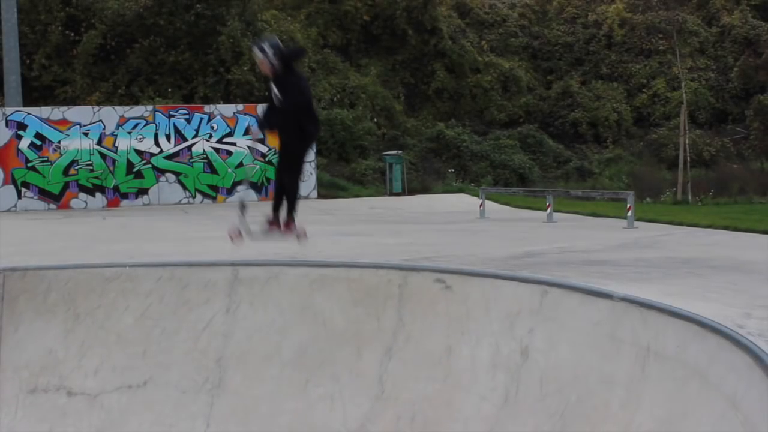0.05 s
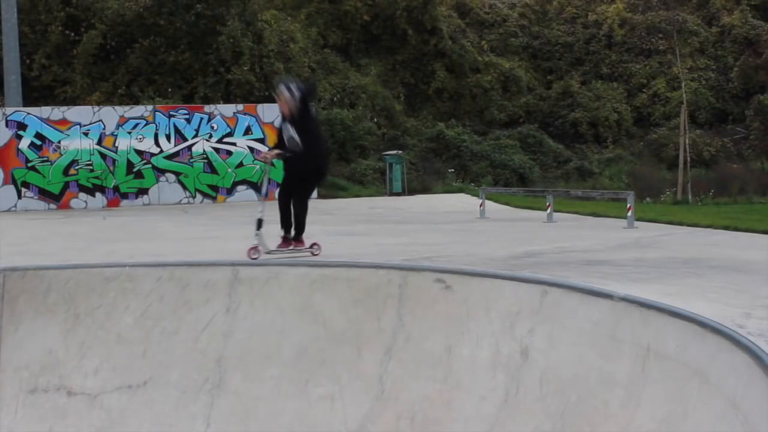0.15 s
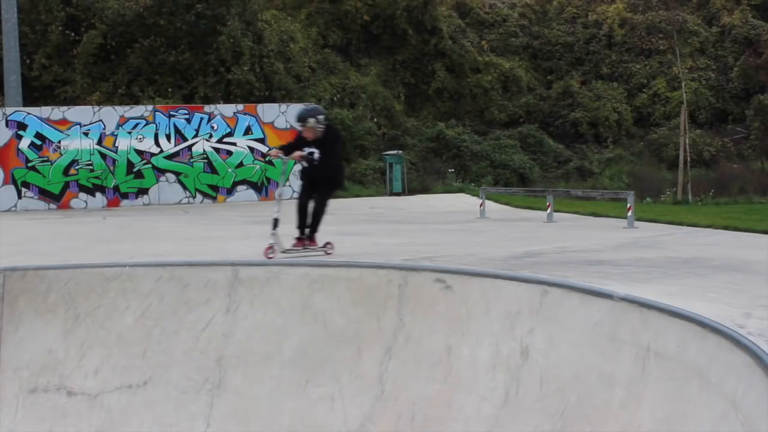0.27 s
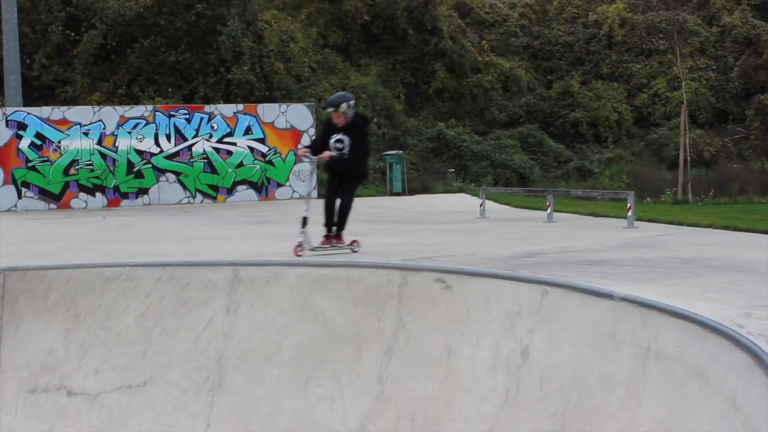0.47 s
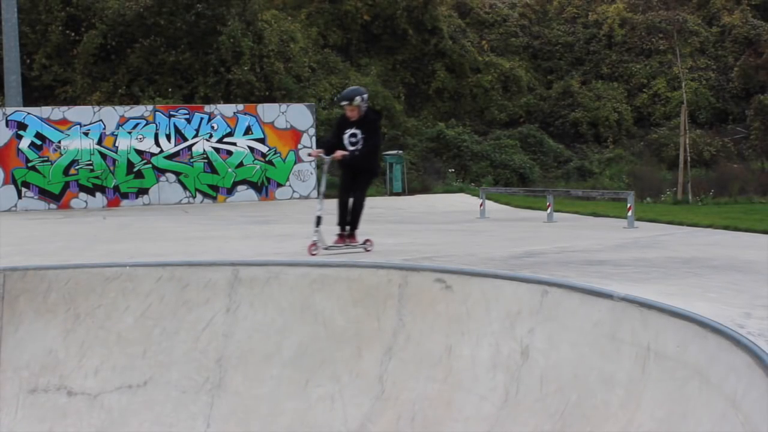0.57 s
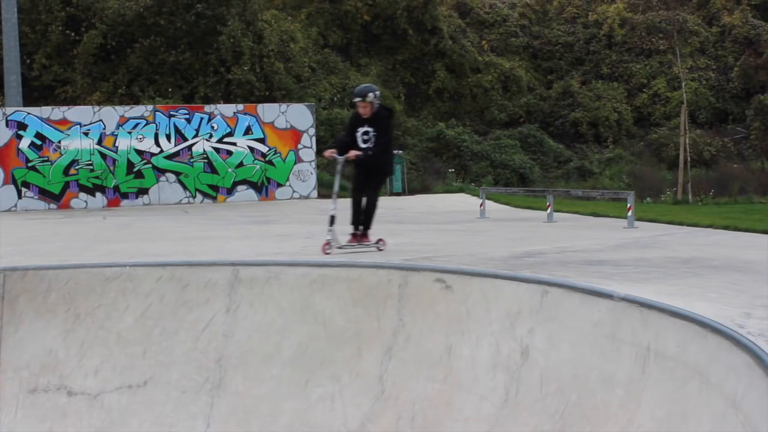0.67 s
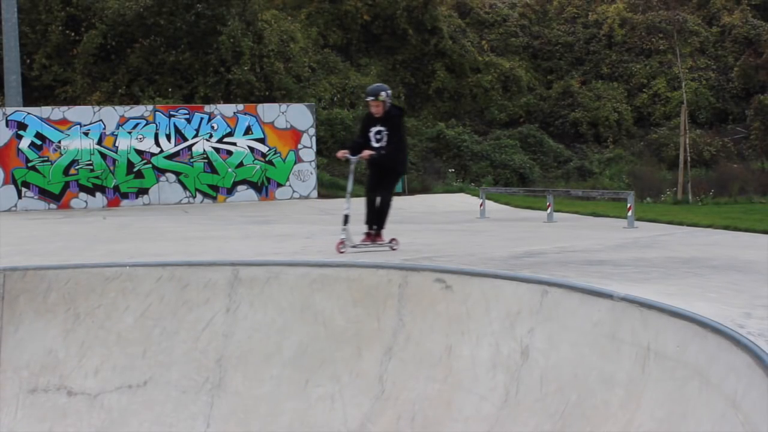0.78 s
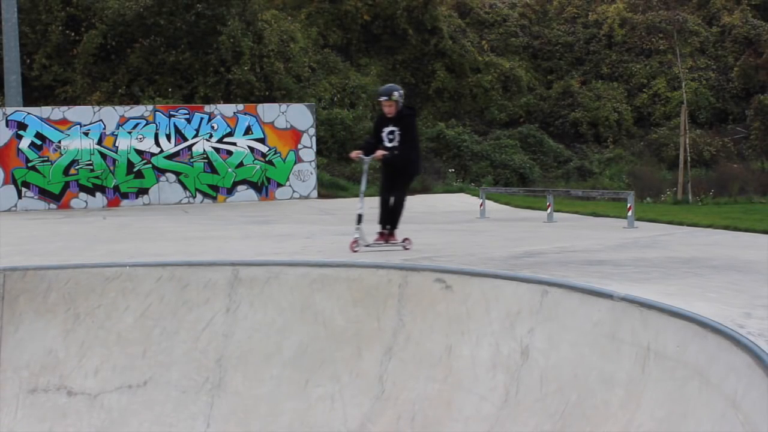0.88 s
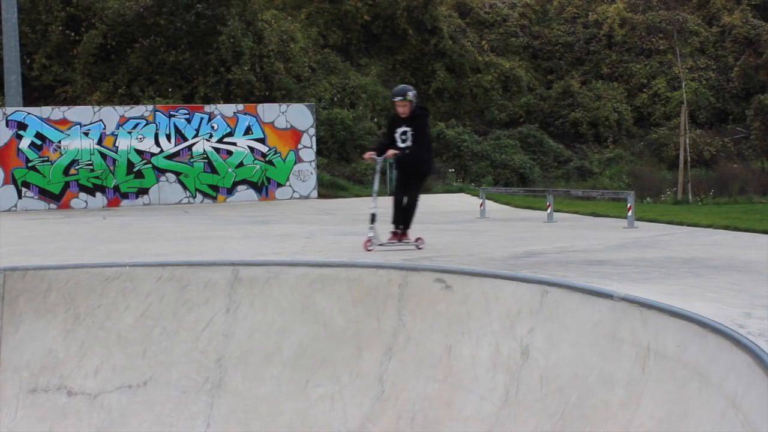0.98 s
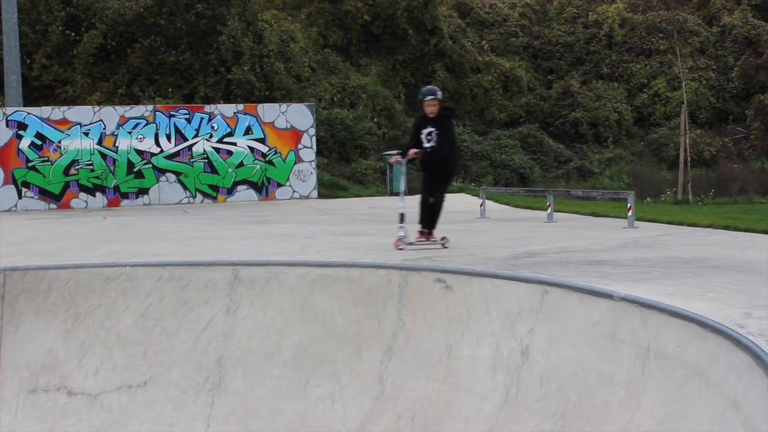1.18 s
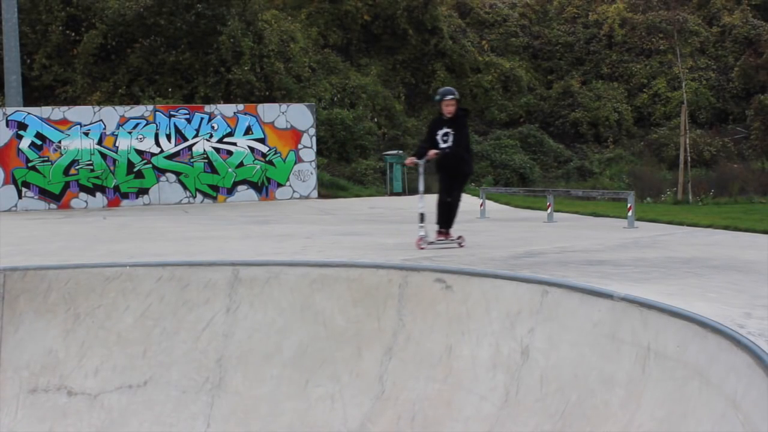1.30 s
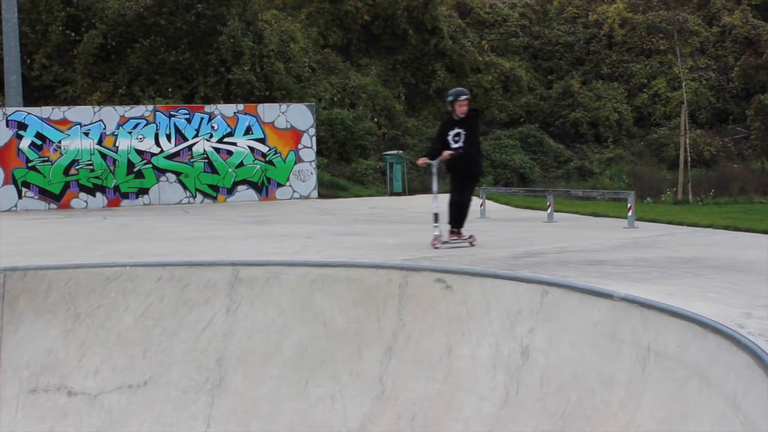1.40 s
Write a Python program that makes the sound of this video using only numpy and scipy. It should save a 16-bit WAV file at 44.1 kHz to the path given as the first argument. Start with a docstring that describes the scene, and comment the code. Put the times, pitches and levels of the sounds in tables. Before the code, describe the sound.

Scooter wheels slap down twice on concrete, followed by soft knocks and a rolling hiss.

```python
"""Skatepark, open air. A stunt scooter lands a jump on concrete: the wheels slap down one after the
other, ringing the metal frame and rattling its fittings; the deck knocks softly as the rider settles.
The hard wheels, whirring faintly before they land, hiss away over the grain of the concrete.
The blows echo faintly from the park; behind them, a steady wash and a distant low rumble."""
import sys
import numpy as np
from scipy import signal
from scipy.fft import rfft, irfft, next_fast_len
from scipy.io import wavfile
from scipy.ndimage import map_coordinates

SR = 44100
rng = np.random.default_rng(int(sys.argv[2]) if len(sys.argv) > 2 else 0)


def output_pcm(signal):
    """Save a mono or channel-first signal as 16-bit PCM at the path in sys.argv[1].

    Samples are clipped to [-1, 1] before scaling.
    """
    pcm = np.clip(np.atleast_2d(signal).T, -1, 1) * 32767
    wavfile.write(sys.argv[1], SR, np.round(pcm).astype(np.int16))


N = 63945


def amp(db):
    """Decibels to gain."""
    return 10 ** (np.asarray(db) / 20)


def unit(x):
    """Scale to rms 1."""
    return x / np.sqrt(np.mean(x ** 2) + 1e-20)


def along(points, hz):
    """Interpolate (freq_hz, value) points on a log frequency axis."""
    freqs_hz, values = np.transpose(points)
    return np.interp(np.log(hz + 1), np.log(freqs_hz + 1), values)


def since(start_s):
    """Seconds since start_s, zero before."""
    return np.maximum(np.arange(N) / SR - start_s, 0)


def level(points):
    """Gain per sample from (time_s, level_db) points."""
    return amp(np.interp(since(0), *np.transpose(points)))


def filtered(x, response):
    """Apply a gain given as a function of Hz."""
    size = next_fast_len(N + SR // 2)
    return irfft(rfft(x, size) * response(np.fft.rfftfreq(size, 1 / SR)), size)[:N]


def coloured(x, colour):
    """Shape x by (freq_hz, gain_db) points; rms 1."""
    return unit(filtered(x, lambda hz: amp(along(colour, hz))))


def noise(colour):
    """Coloured noise, rms 1."""
    return coloured(rng.standard_normal(N), colour)


def band_noise(centre_hz, half_width_hz):
    """Noise in one resonant band, rms 1."""
    white = rng.standard_normal(N)
    return unit(filtered(white, lambda hz: 1 / (1 + ((hz - centre_hz) / half_width_hz) ** 2)))


def burst(start_s, rise_s, hold_s, t60_s):
    """Envelope: attack, hold, exponential release."""
    attack = 1 - np.exp(-since(start_s) / rise_s)
    return attack * np.exp(-np.log(1000) * since(start_s + hold_s) / t60_s)


def ring(start_s, modes, rise_s, hold_s=0, scatter_db=1):
    """Damped modes (pitch_hz, level_db, t60_s), driven while the push holds."""
    out = np.zeros(N)
    for pitch_hz, level_db, t60_s in modes:
        gain = amp(level_db + scatter_db * rng.standard_normal())
        out += gain * burst(start_s, rise_s, hold_s, t60_s) * np.sin(2 * np.pi * pitch_hz * since(start_s))
    return out


def landing():
    """Each wheel touches, then takes the weight: fittings rattle, frame rings, deck thuds."""
    wheels = [(.2029, -13.8, .0115, .028, .0026), (.2629, -14.5, .002, .04, .0016)]  # touchdowns: start_s, rattle_db, hold_s, t60_s, touch_lead_s
    rattle_colours = [
        [(40, -6), (200, -15), (420, -2.5), (800, 3.5), (1150, -4), (1700, 6), (2500, -5), (3600, 0.5),
         (5000, -12), (12500, -16.5), (16000, -24)],
        [(40, -29), (140, 1), (230, -8), (420, 2.5), (800, 4), (1150, -12), (1700, 7.5), (2500, -2.5),
         (3900, 0.5), (7500, -10), (10000, -19.5), (13000, -17), (16000, -40)],
    ]  # one spectrum per wheel: freq_hz, gain_db
    frame_modes = [(812, -1, -14, .06), (1052, -14, -10, .12), (1445, 2, 0, .052), (1640, -9, 2, .03),
                   (1795, -7, -7, .045), (2045, -7, -14, .05), (3012, -7, -12, .045), (3300, 0, -12, .05),
                   (3582, -4, -18, .055), (4100, -5, -10, .04), (4432, -18, -12, .05),
                   (6025, -15, -15, .04), (8040, -18, -14, .05)]  # pitch_hz, first_wheel_db, second_wheel_db, t60_s
    deck_modes = [(297, -18, .3), (378, -8, .06), (420, 0, .045), (528, -2, .05), (605, -17, .14),
                  (712, -6, .035)]  # loaded deck: pitch_hz, level_db, t60_s
    frame_db = [-15.5, -9.5]  # frame strike per wheel: gain_db
    deck_db = [-18, -31]  # deck strike per wheel: gain_db
    split_hz, bright_lag_s = 4850, .0016
    out = np.zeros(N)
    for wheel, (start_s, rattle_db, hold_s, t60_s, lead_s) in enumerate(wheels):
        rattle = noise(rattle_colours[wheel])
        lows = filtered(rattle, lambda hz: 1 / (1 + (hz / split_hz) ** 8))
        touch = rattle * burst(start_s - lead_s, .00017, lead_s, t60_s=.008)
        slam = lows * burst(start_s, .00024, hold_s, t60_s)
        bright = (rattle - lows) * burst(start_s + bright_lag_s, .00023, hold_s / 4, t60_s=.048)
        out += amp(rattle_db) * (amp(-11) * touch + slam + amp(7) * bright)
        struck_modes = [(hz, dbs[wheel], decay_s) for hz, *dbs, decay_s in frame_modes]
        out += amp(frame_db[wheel]) * ring(start_s, struck_modes, rise_s=.00014)
        out += amp(deck_db[wheel]) * ring(start_s, deck_modes, rise_s=.003, hold_s=.012)
    return out


def deck_knocks():
    """The rider's weight sinks onto the deck: low thumps, dull knocks."""
    thumps = [(.205, -36), (.2245, -27), (.266, -34), (.279, -38)]  # start_s, level_db
    knocks = [(0.228, -22.5, 0.097), (0.235, -23.5, 0.068), (0.2404, -28, 0.041), (0.287, -26, 0.05),
              (0.296, -35.5, 0.14), (.320, -34.5, 0.069), (0.3574, -31.5, 0.028), (.832, -36, 0.037),
              (0.885, -38, 0.04), (1.058, -42, 0.022)]  # start_s, level_db, t60_s
    knock_colour = [(40, -8), (130, -14), (220, -7.5), (450, 2.5), (1100, -6.5), (1750, -1), (2500, -23.5),
                    (3600, -14.5), (8000, -24.5), (16000, -43)]  # freq_hz, gain_db
    thump_hz, thump_t60_s = 152, .05
    out = np.zeros(N)
    for start_s, level_db in thumps:
        out += ring(start_s, [(thump_hz, level_db, thump_t60_s)], rise_s=.005, hold_s=.009)
    for start_s, level_db, t60_s in knocks:
        out += amp(level_db) * burst(start_s, .0006, .0019, t60_s) * noise(knock_colour)
    return out


def rolling():
    """Wheels hiss over tiny bumps and grit; uneven concrete makes the lower range flutter."""
    roll_levels = [(.2, -57), (.27, -38.5), (.39, -41.5), (.46, -44), (.52, -46), (.62, -40.5), (.69, -45),
                   (.75, -42.5), (.82, -39), (.9, -40.5), (.97, -39.5), (1.05, -43.5), (1.12, -53),
                   (1.25, -50), (1.45, -52)]  # time_s, level_db
    roll_colour = [(40, -22), (220, -9), (380, -3.5), (650, -5), (850, -6), (1010, 1), (1200, -5.5),
                   (1800, -3.5), (2400, -6), (3500, -9), (5000, -15), (8000, -22), (16000, -37)]  # freq_hz, gain_db
    grit_per_s, grit_db = 1800, -6.5
    patches_per_s, flutter_db, flutter_below_hz = 120, .3, 1200
    grit = (rng.random(N) < grit_per_s / SR) * rng.standard_normal(N)
    hiss = coloured(rng.standard_normal(N) + amp(grit_db) * unit(grit), roll_colour)
    lows = filtered(hiss, lambda hz: 1 / (1 + (hz / flutter_below_hz) ** 4))
    patches = map_coordinates(rng.standard_normal(size=400), [since(0) * patches_per_s])
    return level(roll_levels) * (hiss - lows + lows * amp(flutter_db * patches))


def ticks():
    """Grit and loose fittings tick and scrape, each a brief rough ring in one treble band."""
    hits = [(0.2375, -42.5, 8260, 350, 0.065), (0.2507, -37, 7600, 500, 0.038),
            (0.273, -19.5, 2900, 1800, 0.01), (0.2812, -33, 9100, 1300, 0.013),
            (0.33, -41, 5400, 300, 0.089), (.932, -46, 8700, 3000, 0.02), (1.248, -55, 8700, 700, 0.066),
            (1.335, -57, 6900, 700, 0.33), (1.376, -55, 7200, 700, 0.046)]  # start_s, level_db, centre_hz, half_width_hz, t60_s
    return sum(amp(level_db) * burst(start_s, .0005, .0012, t60_s) * band_noise(centre_hz, half_width_hz)
               for start_s, level_db, centre_hz, half_width_hz, t60_s in hits)


def free_wheels():
    """Airborne wheels whirr and one bearing sings; both fade around the landing."""
    whirr_colour = [(200, -16.5), (520, -2.5), (680, -6.5), (780, 1), (900, -21), (1600, -6), (2600, -18),
                    (5000, -21.5), (14000, -40)]  # freq_hz, gain_db
    tone_until_s, whirr_until_s, fade_s = .12, .18, .03
    tone = band_noise(centre_hz=776, half_width_hz=12) * np.exp(-since(tone_until_s) / fade_s)
    whirr = noise(whirr_colour) * np.exp(-since(whirr_until_s) / fade_s)
    return amp(-45.5) * whirr + amp(-49) * tone


def park_echo(x, delay_s=.012):
    """Scatter from ramps, wall and trees; treble dies first."""
    decay_times = [(150, 0.73), (1000, 0.68), (4000, 0.53), (12000, 0.47)]  # freq_hz, t60_s
    hz, time_s, spectra = signal.stft(rng.standard_normal(SR // 2), SR, nperseg=256)
    decay = np.exp(-np.log(1000) * time_s / along(decay_times, hz)[:, None])
    tail = signal.istft(spectra * decay, SR, nperseg=256)[1]
    tail = np.pad(tail / np.linalg.norm(tail), (int(delay_s * SR), 0))
    return signal.fftconvolve(x, tail)[:N]


def outdoors():
    """Steady open-air wash and a far low drone that swells and dips."""
    air_colour = [(20, -29), (32, -14), (50, 0.5), (70, -8), (140, -11), (240, -10), (330, -10),
                  (575, -7.5), (900, -3), (1890, -8.5), (2300, -15.5), (5000, -24.5), (9000, -30),
                  (16000, -28.5)]  # freq_hz, gain_db
    drone_levels = [(0, -62), (.6, -62), (.75, -53.5), (.9, -60.5), (1.17, -50.5), (1.45, -53)]  # time_s, level_db
    drone_peaks = [(94, 13, -1.7), (135, 14, -0.3)]  # centre_hz, half_width_hz, gain_db
    resonances = lambda hz: sum(amp(gain_db) / (1 + ((hz - centre_hz) / half_width_hz) ** 2)
                                for centre_hz, half_width_hz, gain_db in drone_peaks)
    wash = amp(-45) * noise(air_colour)
    drone = unit(filtered(rng.standard_normal(N), resonances))
    return wash + level(drone_levels) * drone


def scene():
    """Blows with their echo, wheels, open air; mono."""
    low_cut_hz = 55  # keeps the abrupt blows tight, free of sub-bass boom
    blows = landing() + deck_knocks() + ticks()
    blows = filtered(blows, lambda hz: (1j * hz / (low_cut_hz + 1j * hz)) ** 2)
    return (blows + amp(-26.5) * park_echo(blows) + rolling() + free_wheels() + outdoors())[None]


def record(dry):
    """Round off the highest peaks, then band-limit."""
    ceiling, top_hz = .92, 16000
    rounded = dry[0] / (1 + np.abs(dry[0] / ceiling) ** 8) ** (1 / 8)
    return filtered(rounded, lambda hz: hz < top_hz)[None]


dry = scene()
out = record(dry)
output_pcm(out)
```